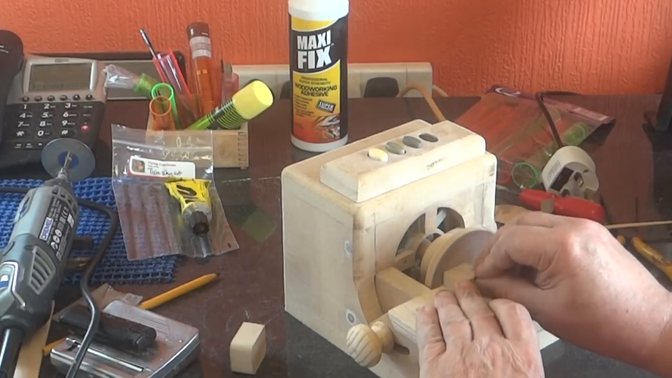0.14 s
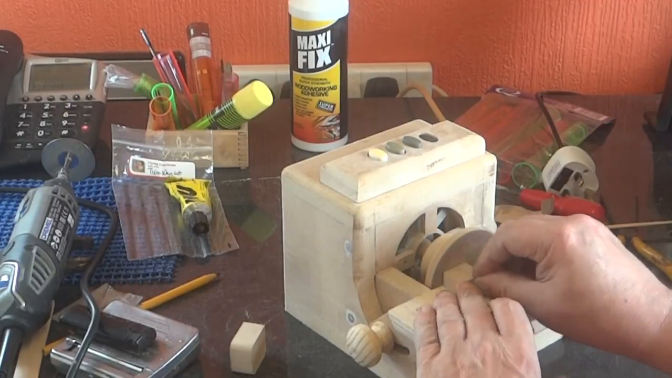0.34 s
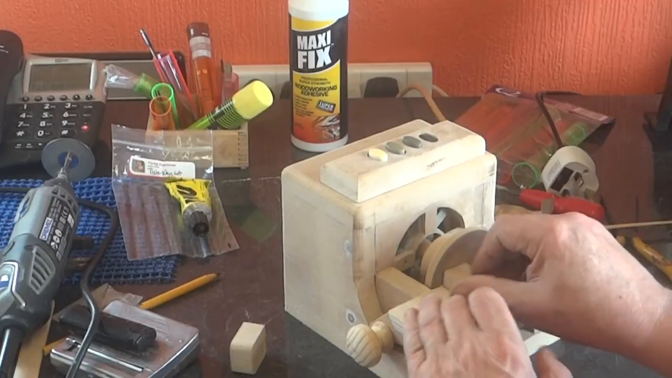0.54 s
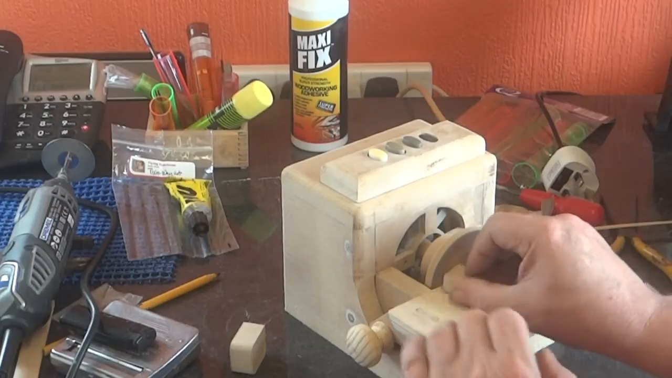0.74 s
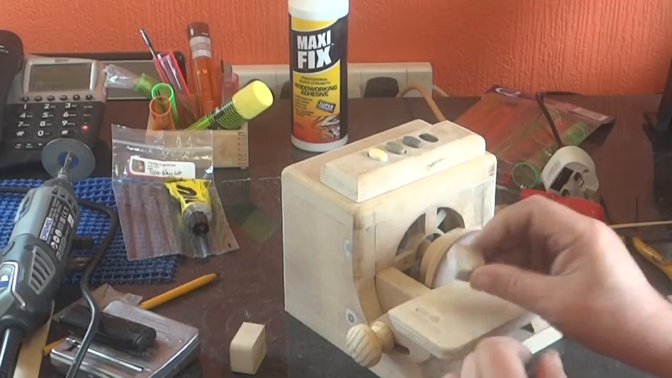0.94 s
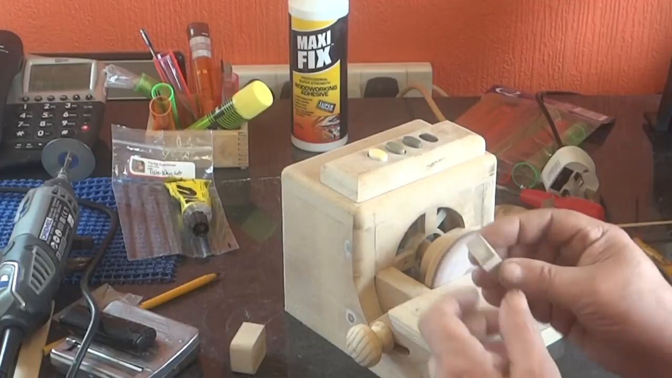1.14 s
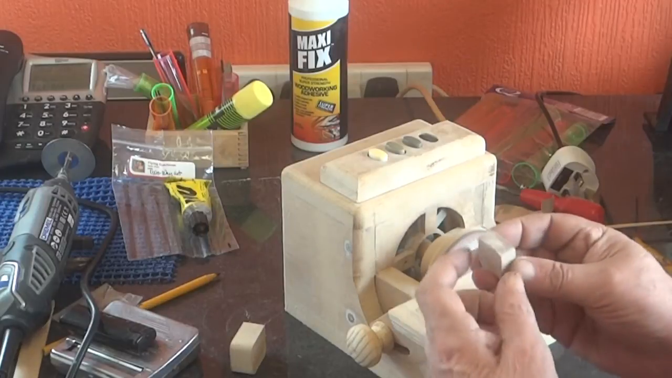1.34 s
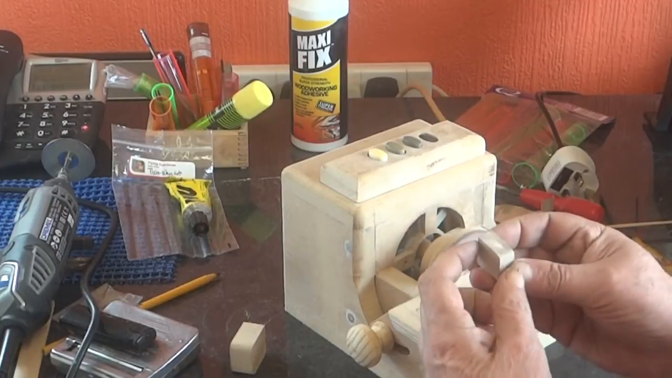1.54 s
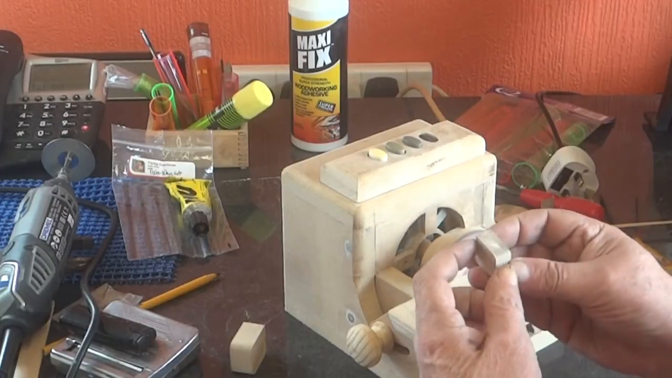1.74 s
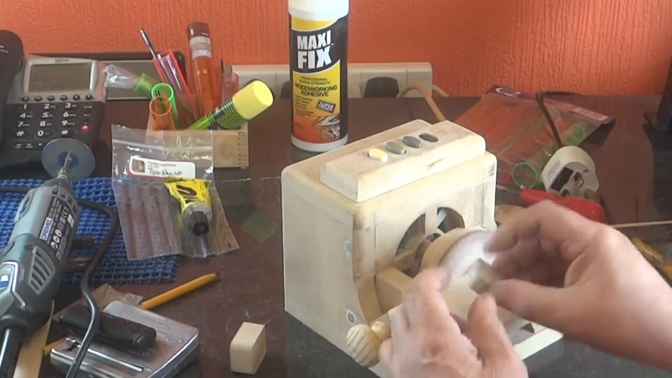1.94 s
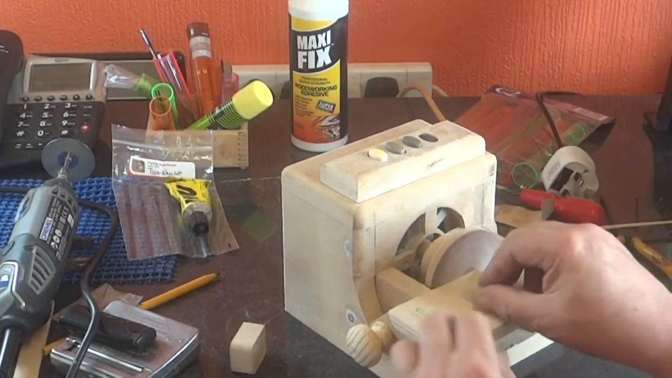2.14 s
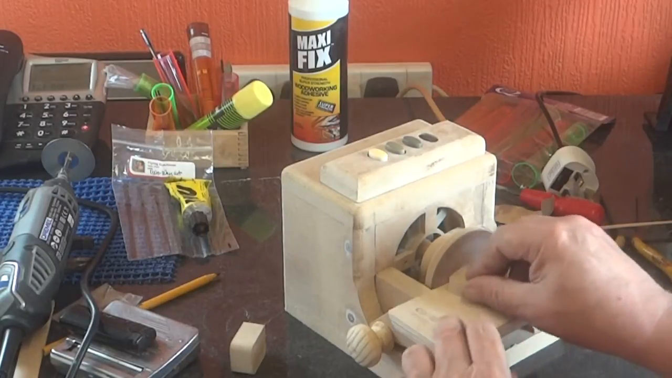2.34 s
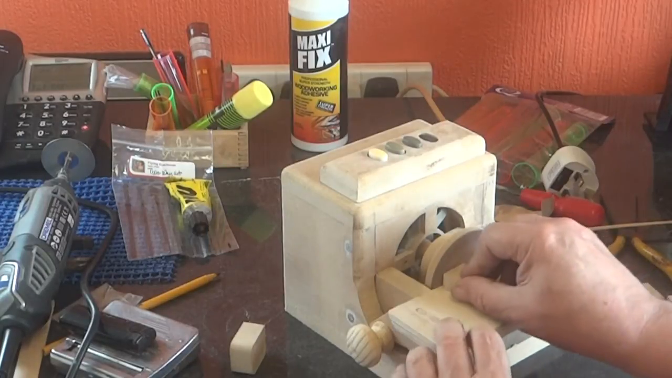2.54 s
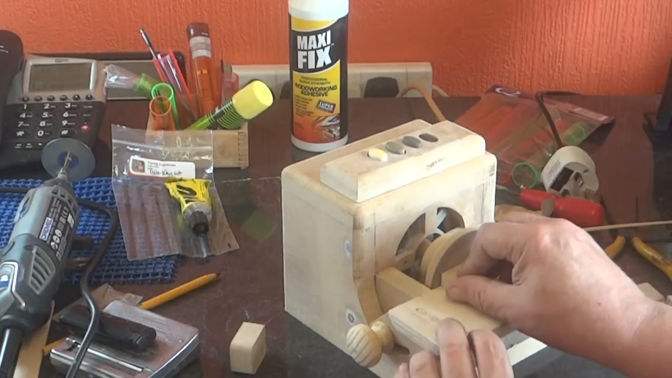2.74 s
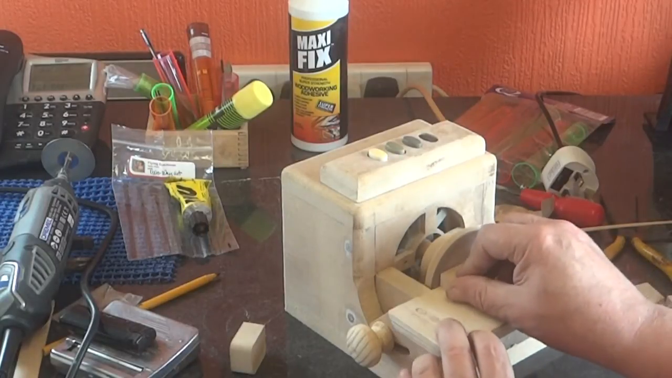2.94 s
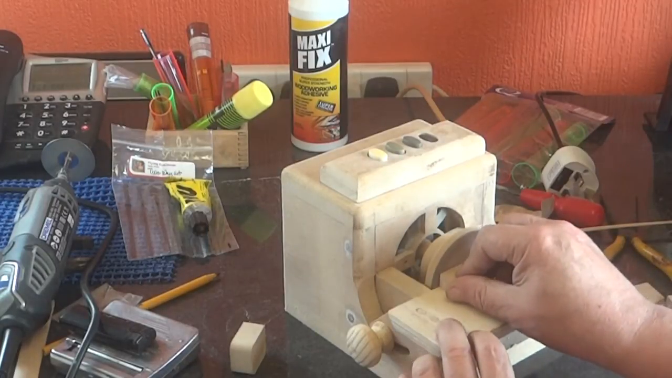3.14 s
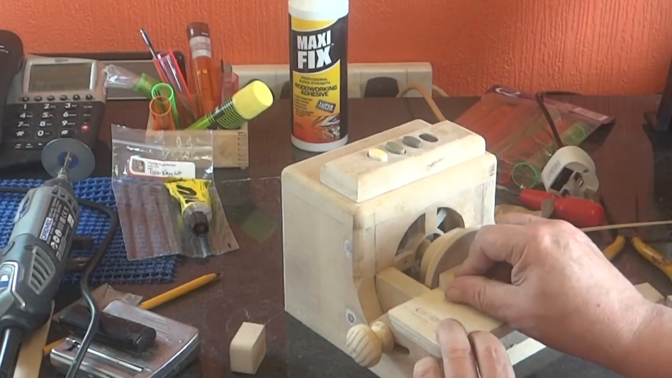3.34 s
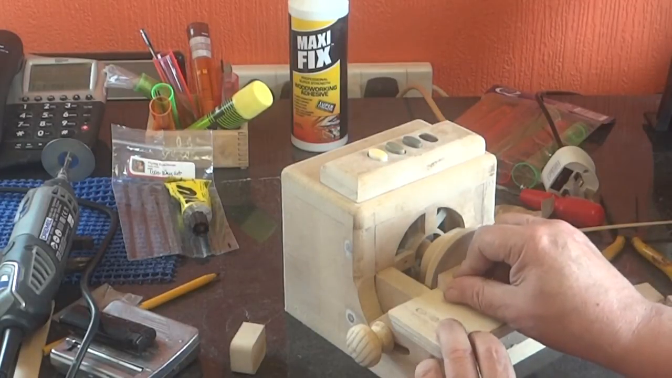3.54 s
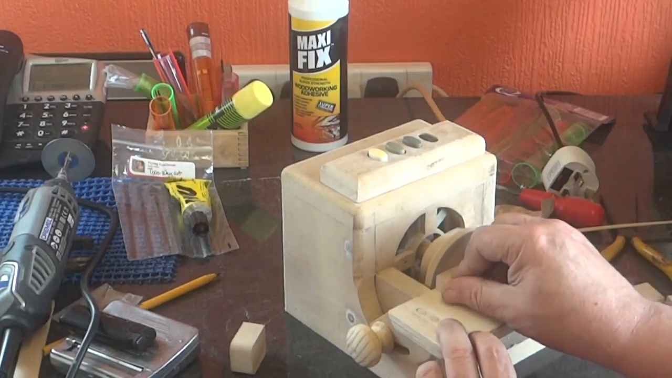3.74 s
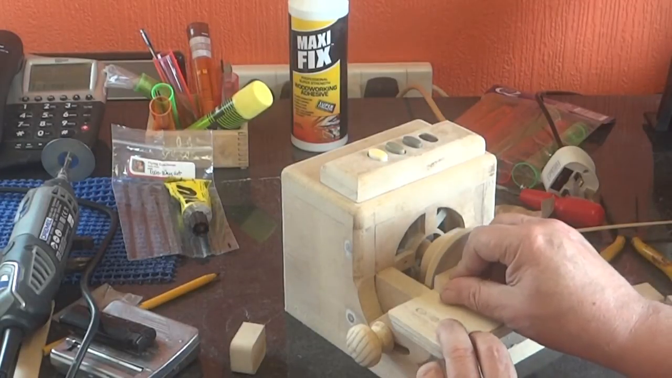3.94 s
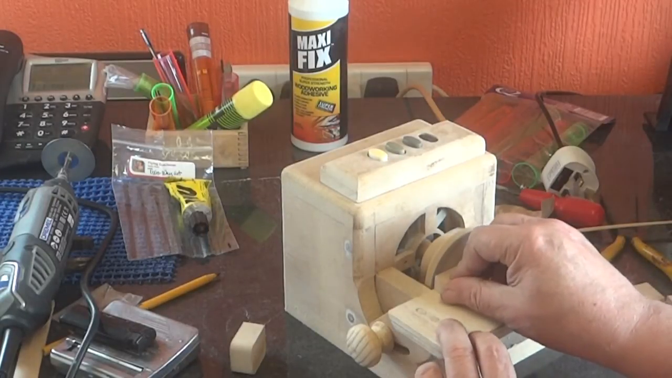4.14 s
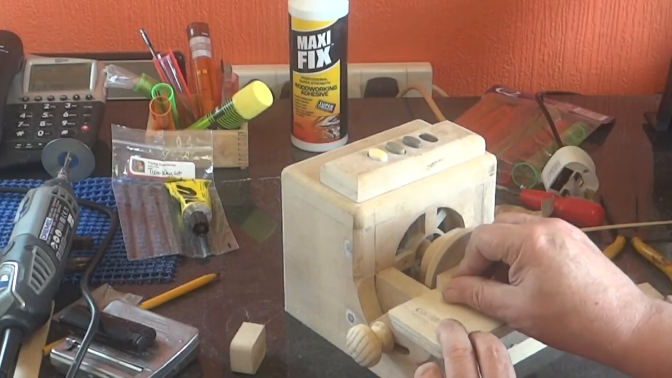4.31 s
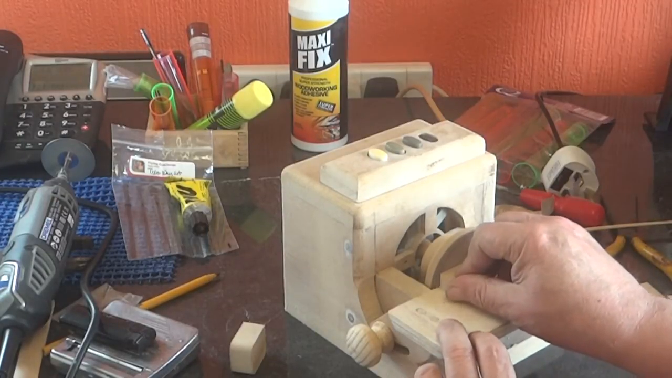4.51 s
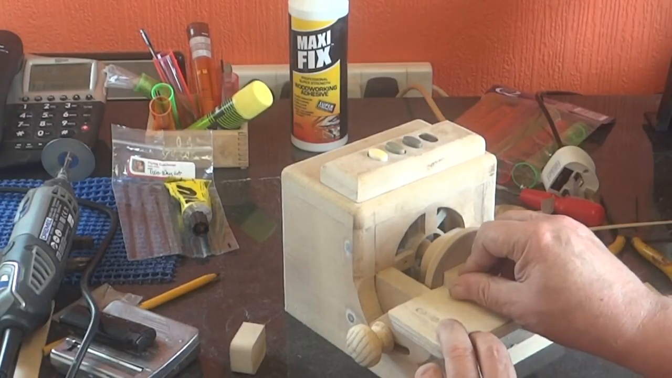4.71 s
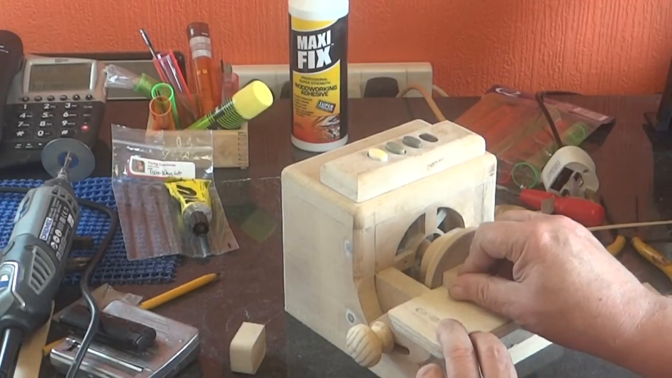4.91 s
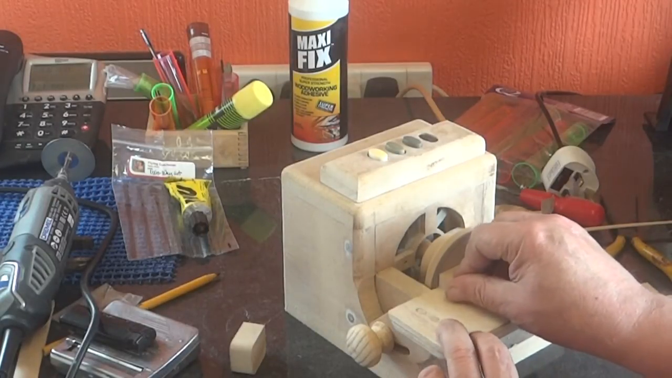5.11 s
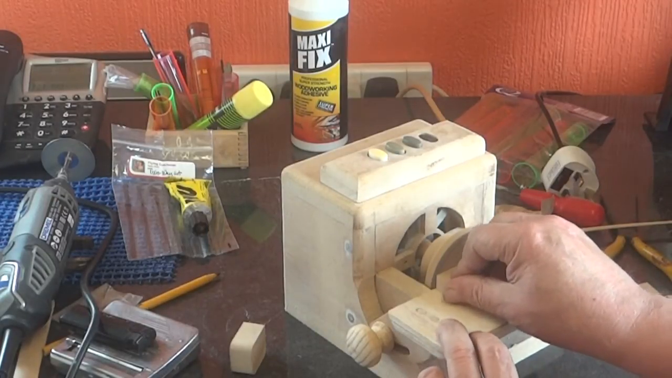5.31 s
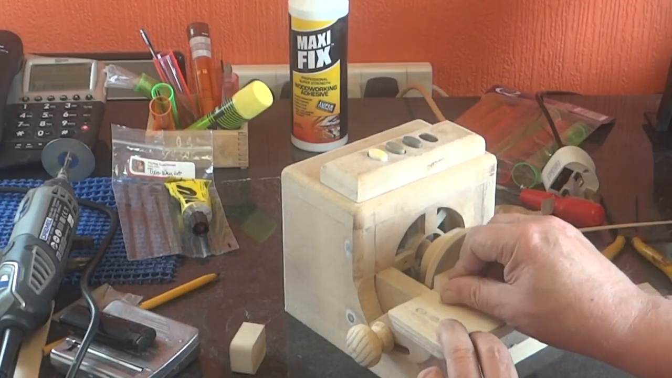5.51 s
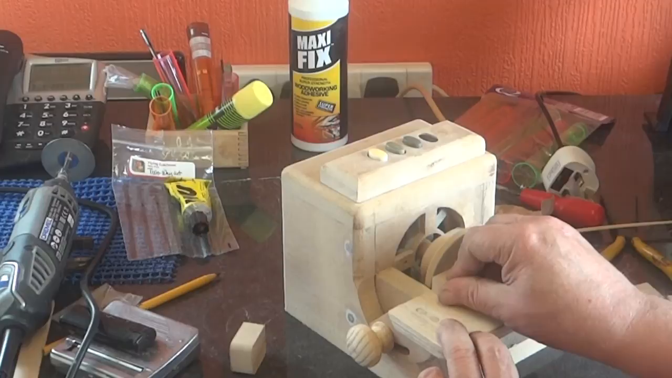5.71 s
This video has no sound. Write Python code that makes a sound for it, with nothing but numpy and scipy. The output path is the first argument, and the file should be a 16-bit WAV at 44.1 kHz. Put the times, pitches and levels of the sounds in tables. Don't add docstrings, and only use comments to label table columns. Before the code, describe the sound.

A small electric disc sander runs throughout, with a steady low hum near 100 Hz, soft rumble, fan air, a thin 3 kHz whine and metallic ticks about 24 times a second, slowing slightly under load. From 0 to 0.4 s hardwood on sandpaper makes a loud, bright, gritty hiss; it thins and pulses with the disc until about 0.6 s. A short, rougher, squealing rasp comes at 0.7-0.85 s. Then the machine idles, its hum and ticking exposed, with tiny finger taps around 1.05 and 1.5 s and barely audible rubbing. At 2.11-2.14 s the block lands with a dull touch and hard wooden crack, then scrapes along the rest from 2.17 to 2.55 s. Two ringing taps at 2.57 and 2.62 s accompany renewed contact. Dense, loud sanding hiss, fizzy on top with panel resonance, continues to nearly 5.8 s, wavering only slightly. Close pickup, short room echo.

```python
import sys
import numpy as np
from scipy import signal
from scipy.fft import rfft, irfft, next_fast_len
from scipy.io import wavfile
from scipy.ndimage import uniform_filter1d, map_coordinates

SR = 44100
rng = np.random.default_rng(int(sys.argv[2]) if len(sys.argv) > 2 else 0)


def bounce(signal):
    frames = np.transpose(np.atleast_2d(signal))
    limited = np.clip(frames, -1, 1)
    pcm = np.round(limited * 32767).astype(np.int16)
    wavfile.write(sys.argv[1], SR, pcm)


def invert_db(level):
    return 10 ** (np.asarray(level, dtype=float) / 20)


N = 254456
T = np.arange(N) / SR


def unit(x):
    return x / np.sqrt(np.mean(x ** 2) + 1e-20)


def along(points, hz):
    f, v = np.transpose(points)
    return np.interp(np.log(hz + 1), np.log(f + 1), v)


def curves(*spans):
    rows = []
    for span in spans:
        first, last = span[0], span[-1]
        rows.append((first[0] - .012, -90, *first[2:]))
        rows.extend(span)
        rows.append((last[0] + 0.03, -90, *last[2:]))
    times, *columns = np.transpose(rows)
    return [np.interp(T, times, column) for column in columns]


def wobble(rate):
    return map_coordinates(rng.standard_normal(int(N * rate / SR) + 4), [T * rate])


def filtered(x, response):
    m = next_fast_len(N + SR // 2)
    return irfft(rfft(x, m) * response(np.fft.rfftfreq(m, 1 / SR)), m)[..., :N]


def modes(table):
    def response(f):
        total = 0
        for k, (centre, width, db) in enumerate(table):
            peak = 1j * f * width / (centre * centre - f * f + 1j * f * width)
            total = total + (-1) ** k * invert_db(db) * peak
        return total
    return response


def coloured(x, spectrum):
    return unit(filtered(x, lambda hz: invert_db(along(spectrum, hz))))


def grit(scatter_db, patchy_db):
    cuts = rng.standard_normal(N) * invert_db(scatter_db * wobble(1500))
    z = signal.stft(cuts, nperseg=512)[2]
    field = rng.standard_normal(z.shape)
    field = uniform_filter1d(uniform_filter1d(field, 8, 0), 10, 1)
    return signal.istft(z * invert_db(patchy_db * unit(field)), nperseg=512)[1][:N]


# (time [s], speed [turns/s])
SHAFT_SPEED = [
    (0, 23.2),
    (.4, 24.237),
    (2.55, 24.237),
    (2.9, 22.5),
    (5.8, 22.2),
]


def turns():
    tick_s = 1.0325
    angle = np.cumsum(np.interp(T, *np.transpose(SHAFT_SPEED))) / SR
    return angle - angle[round(tick_s * SR)]


# (time [s], pressure [dB], flat contact [0-1], lean on the rest [0-1])
FIRST_PASS = [(0, -21, 0.6, 0.48), (.128, -22, 0.47, 0.61), (.176, -30.5, 0.8, 1), (.24, -23.5, 1, 0.32),
              (.4, -25, 1, 0.16), (.435, -29.5, 0.8, .05), (.515, -36.5, 0.13, 0.47), (.56, -47, 0.16, .5),
              (.61, -70, 0, .4)]
SHORT_PASS = [(.67, -51, 0, 0.7), (.7, -59, 0.2, 0.5), (.724, -39, 0.3, 0.2), (.745, -29, 0.2, 0.36),
              (.77, -26.5, 0.1, 0.5), (.8, -31, .2, 0.64), (.834, -23.5, 0, 0.1), (.842, -35, 0, 0.3)]
LONG_PASS = [(2.559, -26, 0.09, 0.53), (2.74, -28, 0.55, 0.44), (2.77, -24, .9, 0.36), (3.8, -26.5, 1, 0.4),
             (4.05, -28, 0.9, 0.52), (4.55, -25.5, 0.97, 0.47), (4.82, -26, 0.78, 0.35),
             (5.15, -25, 0.89, 0.52), (5.77, -27.5, 0.77, 0.54)]


def pressing():
    return curves(FIRST_PASS, SHORT_PASS, LONG_PASS)


# (frequency [Hz], level [dB per Hz])
HISS_SPECTRUM = [(300, -100), (1650, -33.5), (2800, -8.5), (3600, -10), (4100, -2.5), (4500, -7.5),
                 (5000, 0), (6000, -1.5), (7100, 2.5), (8200, 1), (9200, 0), (10400, -6), (12000, -9.5),
                 (15600, -47)]
# (frequency [Hz], level [dB per Hz])
FIZZ_SPECTRUM = [(4000, -120), (7500, -11.5), (9500, -8), (10400, -7), (13100, -1), (15000, -4),
                 (15900, -13)]
# (frequency [Hz], level [dB per Hz])
BLOCK_SPECTRUM = [(1500, -98), (2700, -22), (3200, -4), (4200, 0.5), (5200, -3), (6500, -0.5), (10000, -84)]
# (frequency [Hz], width [Hz], level [dB])
HOUSING_PANELS = [(1074, 48, 0), (1195, 176, -6.5), (1382, 72, -2), (1607, 58, -1), (1892, 53, -1),
                  (2222, 183, -5.5), (2546, 60, -1), (2724, 140, -8), (2924, 57, -0.5), (614, 630, -15.5)]


def sanding(angle, pressure_db, flat, lean):
    firm_db = -27
    lighter_db = np.clip(firm_db - pressure_db, 0, 40)
    fizz_db = -23 + 17 * flat
    panel_db = -21.5 + 21.5 * lean
    block_db = -3 - 13 * np.tanh(2.2 * np.abs(flat)) + 0.28 * lighter_db

    high_spot = 2.52 * np.exp(1.45 * (-np.cos(2 * np.pi * (angle - .03)) - 1))
    share = np.clip(0.06 + 0.037 * lighter_db, 0, .9)
    unsteady_db = 0.1 * wobble(12) + 0.27 * wobble(44)
    press = (1 - share + share * high_spot) * invert_db(pressure_db + unsteady_db)

    cuts = grit(scatter_db=0.5, patchy_db=1.05)
    shaking = grit(scatter_db=1.0, patchy_db=1.43)
    panels = unit(filtered(shaking, lambda f: modes(HOUSING_PANELS)(f) / (1 + (450 / (f + 1)) ** 4)))
    sound = coloured(cuts, HISS_SPECTRUM)
    sound = sound + invert_db(fizz_db) * coloured(cuts, FIZZ_SPECTRUM)
    sound = sound + invert_db(block_db) * coloured(cuts, BLOCK_SPECTRUM)
    return press * (sound + invert_db(panel_db) * panels)


# (time [s], load [0-1])
MOTOR_LOAD = [(0, 0.12), (.15, 0.2), (.33, .8), (.52, 0.03), (.72, 0.12), (.83, 0.35), (.89, 0.04),
              (2.55, 0), (2.66, 0.7), (2.85, 0.18), (3.07, 0.6), (3.17, 0.17), (3.35, 0.7), (3.5, 0.03),
              (3.7, 0.65), (3.85, 0.13), (4.8, 0.67), (5.77, .3)]
# (multiple of the hum [count], level [dB])
OVERTONES = [(2, -10), (3, 0), (4, -13), (5, -20), (6, -26), (8, -23)]


def motor_hum():
    load = np.clip(np.interp(T, *np.transpose(MOTOR_LOAD)), 0, 1.5)
    hum_db = -56 + 4 * np.tanh(3 * load)
    buzz_db = -45.5 - 29.5 * load + 12.5 * load * wobble(9)
    phase = 2 * np.pi * 99.95 * T
    hum_sides, buzz_sides = np.array([[.055], [-.055]]), np.array([[.16], [-.16]])
    hum = invert_db(hum_db + 0.27 * wobble(8)) * np.sin(phase + hum_sides)
    buzz = 0
    for k, db in OVERTONES:
        even_loss_db = 15 * load * (k == 2)
        level = invert_db(db - even_loss_db + 1.1 * wobble(12))
        buzz = buzz + level * np.sin(k * phase + .15 * wobble(15) + k + buzz_sides)
    return np.sqrt(2) * (hum + invert_db(buzz_db - 2.5) * buzz)


# (frequency [Hz], level [dB])
BEARING_LINES = [(3000, -69), (2520, -86)]


def bearing_whine(angle):
    idle_speed = SHAFT_SPEED[1][1]
    whine = sum(invert_db(db) * np.sin(2 * np.pi * hz / idle_speed * angle) for hz, db in BEARING_LINES)
    return np.sqrt(2) * whine * (1 + 0.22 * np.cos(2 * np.pi * (angle - .15)))


# (frequency [Hz], level [dB per Hz])
RUMBLE_SPECTRUM = [(15, -37), (30, -19), (60, -14.5), (100, -11.5), (160, -8), (230, -11), (270, -7.5),
                   (350, 1.5), (430, -9.5), (560, -15), (800, -21), (1100, -36), (2200, -120)]
# (frequency [Hz], level [dB per Hz])
FAN_SPECTRUM = [(250, -29), (420, -5.5), (681, -12.5), (1070, -13), (1610, -15), (2080, -9.5),
                (2530, -11.5), (2810, -20), (3080, -9), (3530, -14.5), (4300, -5), (6080, -22), (7400, -10),
                (8600, -19.5), (15500, -36)]


def rumble_and_fan(angle, lean):
    rumble_db = -55 + 10.5 * uniform_filter1d(lean, size=2000) ** 2
    rumble = invert_db(rumble_db) * coloured(grit(scatter_db=1.0, patchy_db=1.5), RUMBLE_SPECTRUM)
    air = coloured(grit(scatter_db=.6, patchy_db=.5), [(100, -68), *FAN_SPECTRUM])
    return rumble + invert_db(-58.0) * air * (1 + 0.082 * np.cos(2 * np.pi * (angle - .2)))


# (frequency [Hz], width [Hz], level [dB])
FRAME_RING = [(350, 240, -1.5), (1440, 280, -1), (2535, 87, 7.5), (3100, 140, 0), (4120, 450, 2),
              (5000, 810, 1.5), (5300, 270, 2.5), (7170, 410, 8), (7810, 140, 4), (9100, 600, -11)]


def ticks(angle):
    at = np.flatnonzero(np.diff(np.floor(angle)))
    cycle = 2 * np.pi * np.floor(angle[at + 1]) / 8
    chance = rng.standard_normal((len(at), 2))
    click, knock = np.zeros((2, N))
    click[at] = invert_db(-38.5 + 8 * np.cos(cycle - 3.7) + 1.5 * chance[:, 0])
    knock[at] = invert_db(-17.5 + 2.3 * np.cos(cycle - 4.4) + 1.1 * chance[:, 1])

    t = np.arange(1800) / SR
    fade = invert_db(-60 * t / .024) * (1 - np.exp(-t / .002)) + .045
    chatter = rng.standard_normal(len(t)) * fade
    chatter[:20] += 1.94 * np.hanning(20) * np.cos(np.arange(20) * .7)
    chatter = chatter / np.linalg.norm(chatter)
    knock = signal.fftconvolve(np.pad(knock, (20, 0)), chatter)[:N]

    bright = modes([(11200, 2200, 0)])
    frame = modes(FRAME_RING)
    clicks = filtered(click, lambda f: bright(f) ** 2)
    return clicks + filtered(knock, lambda f: frame(f) / (1 + 1j * f / 9000) ** 3)


# (time [s], peak [dB], pitch [Hz], time to fade 60 dB [s])
FINGER_TAPS = [
    (1.053, -42, 1320, 0.056),
    (1.068, -42.5, 1610, 0.051),
    (1.4995, -47, 1574, 0.046),
    (2.5656, -36, 1394, 0.15),
    (2.618, -29, 1390, 0.056),
]


def finger_taps():
    out, t = np.zeros(N + SR), np.arange(SR // 4) / SR
    for s, db, hz, t60 in FINGER_TAPS:
        note = np.sin(2 * np.pi * hz * t) * (1 - np.exp(-t / .001))
        out[round(s * SR):][:len(t)] += invert_db(db + 1.5 - 60 * t / t60) * note
    return out[:N]


# (time [s], level [dB])
FIDGET_LEVEL = [
    (1.225, -72),
    (1.24, -66),
    (1.444, -66),
    (1.496, -64),
    (1.75, -80),
]
# (time [s], level [dB])
SLIDE_LEVEL = [
    (2.17, -46),
    (2.25, -57),
    (2.3, -50.5),
    (2.502, -50),
    (2.55, -44),
]
# (frequency [Hz], width [Hz], level [dB])
SCRAPE_RING = [(1160, 170, 5), (1700, 600, -3.5), (2110, 150, 5), (2740, 220, 3), (2960, 110, 7),
               (4640, 4300, -6.5)]


def rubbing():
    (slide_db,), (fidget_db,) = curves(SLIDE_LEVEL), curves(FIDGET_LEVEL)
    rub = grit(scatter_db=1.1, patchy_db=.6)
    scrape, skin = modes(SCRAPE_RING), modes([(1340, 130, 0), (1570, 150, -1)])
    slide = unit(filtered(rub, lambda f: scrape(f) / (1 + (800 / (f + 1)) ** 4 + (f / 5500) ** 4)))
    fidget = unit(filtered(rub, lambda f: skin(f) ** 2))
    return invert_db(slide_db + 3.5 + .4 * wobble(22.0)) * slide + invert_db(fidget_db + 0.5) * fidget


# (time [s], peak [dB], brightness [Hz], time to fade 60 dB [s])
BLOCK_DROPS = [
    (2.112, -35, 1700, 0.066),
    (2.144, -17, 4050, 0.04),
]
# (frequency [Hz], level [dB], time to fade 60 dB [s])
REST_NOTES = [(478, -3.5, 0.066), (1237, 1.5, 0.076), (1420, -4, .06), (1830, 1, .05), (2290, -3, .05),
              (2480, 5, 0.045), (3140, -9, 0.036), (4000, -8, .04), (4470, 8, 0.033), (5230, -4, .04)]


def block_drops():
    out, t = np.zeros(N + SR), np.arange(SR // 4) / SR
    for s, db, bright_hz, t60 in BLOCK_DROPS:
        ring = 0
        for hz, level, life in REST_NOTES:
            note = invert_db(level - 7 - 60 * t / life) * np.sin(2 * np.pi * hz * t)
            ring = ring + note / (1 + (hz / bright_hz) ** 4)
        band = signal.butter(3, [1150, bright_hz], "band", fs=SR, output="sos")
        noise = unit(signal.sosfilt(band, rng.standard_normal(len(t))))
        crack = (invert_db(-60 * t / t60) + invert_db(-14.5 - 60 * t / (4 * t60))) * noise
        out[round(s * SR):][:len(t)] += invert_db(db - 8.0) * (ring + crack) * (1 - np.exp(-t / 0.00032))
    return out[:N]


# (frequency [Hz], time to fade 60 dB [s])
ECHO_TIME = [(200, 0.26), (1000, 0.46), (4000, 0.35), (8000, 0.29), (15000, 0.15)]
# (frequency [Hz], level [dB])
ECHO_WIDTH = [(100, -7.5), (500, -4), (1000, -4), (2500, -21), (4000, -11.5), (8000, -6.5), (11000, -10.5),
              (13000, -65)]


def room(x):
    hz, t, z = signal.stft(rng.standard_normal((2, SR // 2)), SR, nperseg=256)
    fade = invert_db(-60 * t / along(ECHO_TIME, hz)[:, None])
    tail = signal.istft(z * fade, SR, nperseg=256)[1]
    tail = tail / np.linalg.norm(tail[0])
    delayed = np.pad(x, (200, 0))[None]
    mid, side = signal.fftconvolve(delayed, tail, axes=1)[:, :N]
    side = filtered(side, lambda hz: invert_db(along(ECHO_WIDTH, hz)))
    return invert_db(-7.5) * mid + invert_db(-6.5) * np.array([side, -side])


def scene():
    angle = turns()
    pressure_db, flat, lean = pressing()
    work = sanding(angle, pressure_db, flat, lean)
    tones = motor_hum() + bearing_whine(angle)
    drone = rumble_and_fan(angle, lean * (pressure_db > -40))
    hands = finger_taps() + rubbing() + block_drops()
    near = invert_db(-1.5) * (work + ticks(angle) + hands) + drone
    return near + tones + room(near)


def top_cut(x):
    return signal.sosfilt(signal.butter(12, 16060, fs=SR, output="sos"), x)


def record(dry):
    mix = filtered(dry, lambda hz: hz < 16000)
    return top_cut(mix)


dry = scene()
out = record(dry)
bounce(out)
```